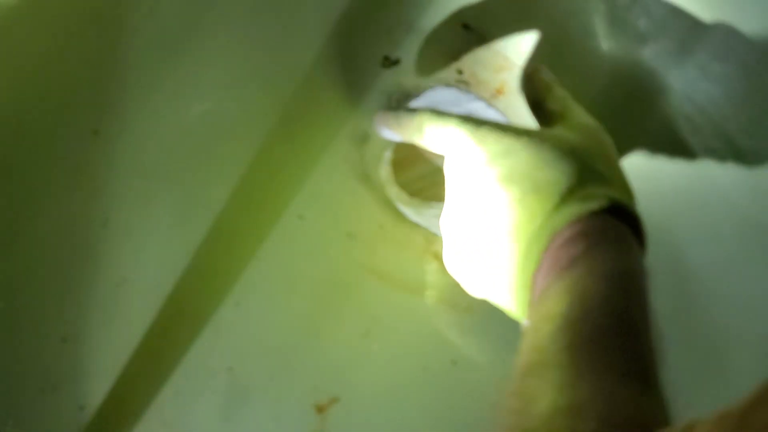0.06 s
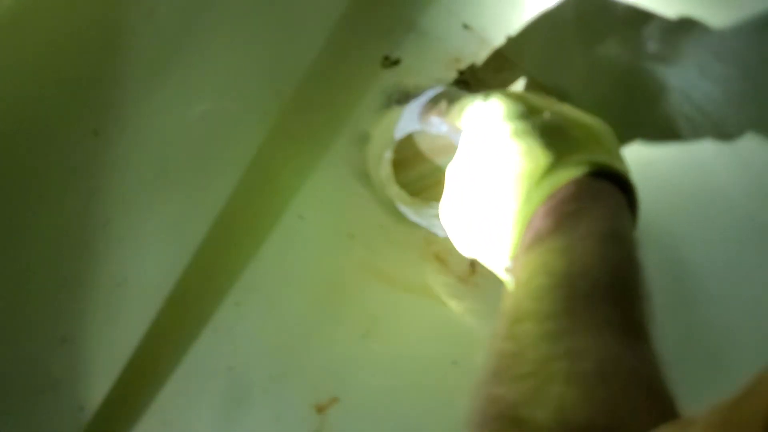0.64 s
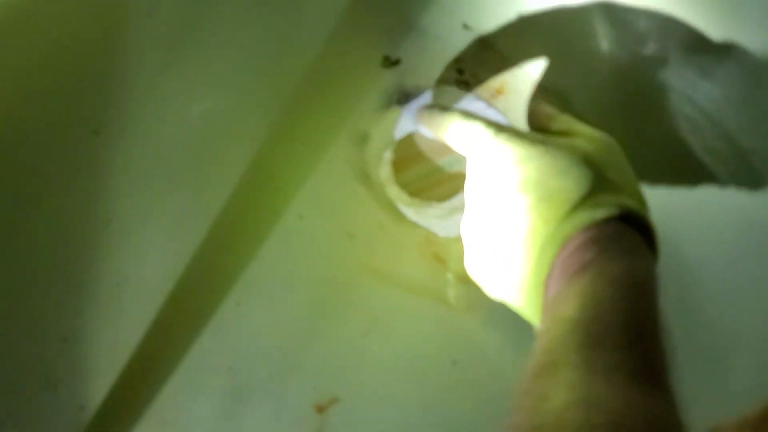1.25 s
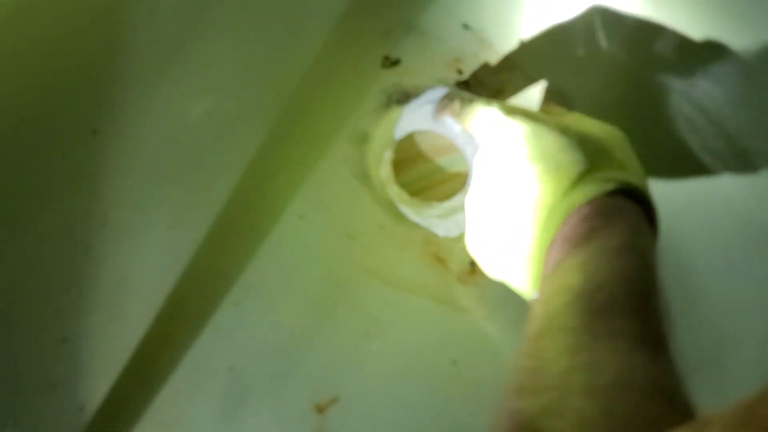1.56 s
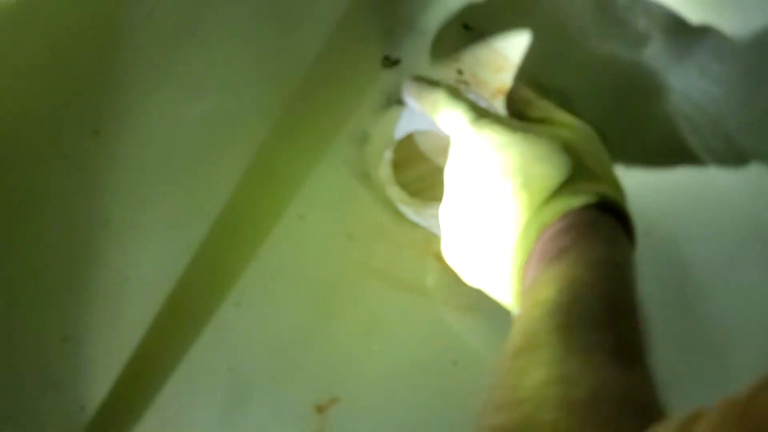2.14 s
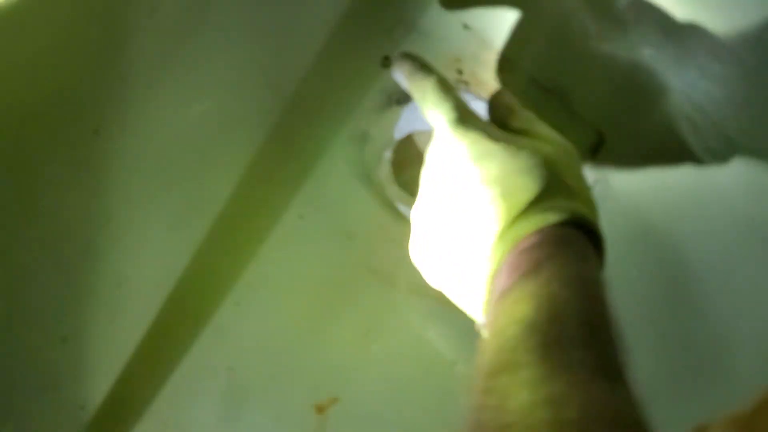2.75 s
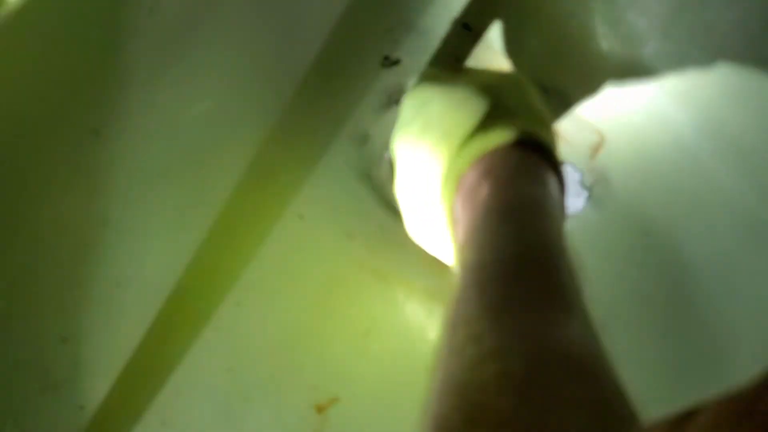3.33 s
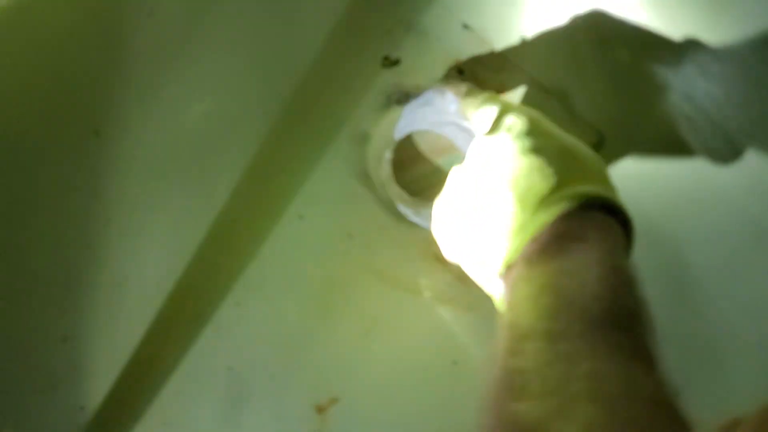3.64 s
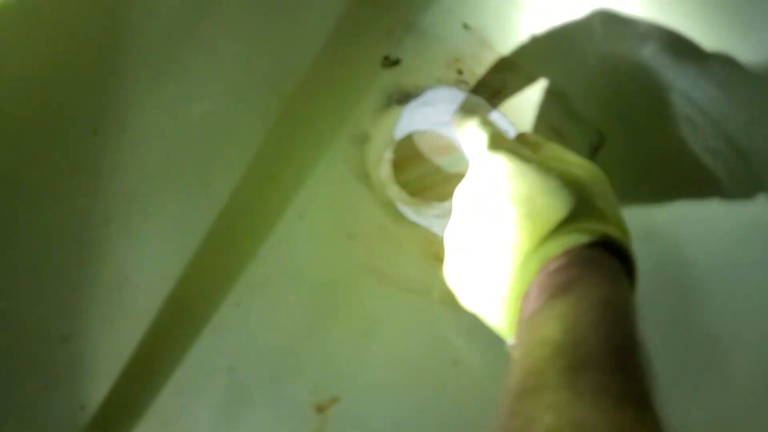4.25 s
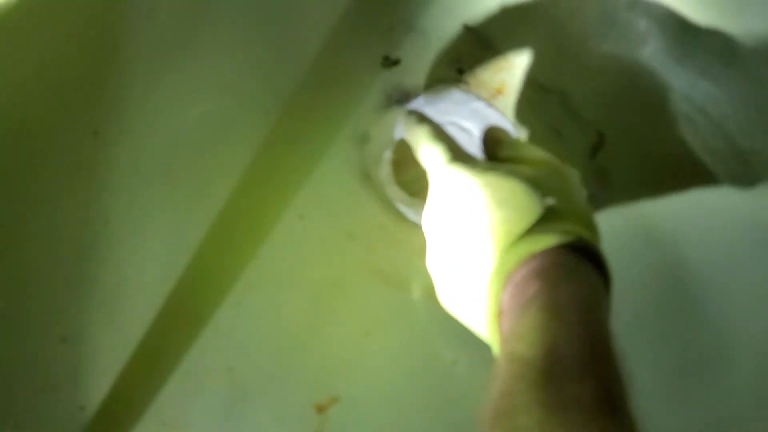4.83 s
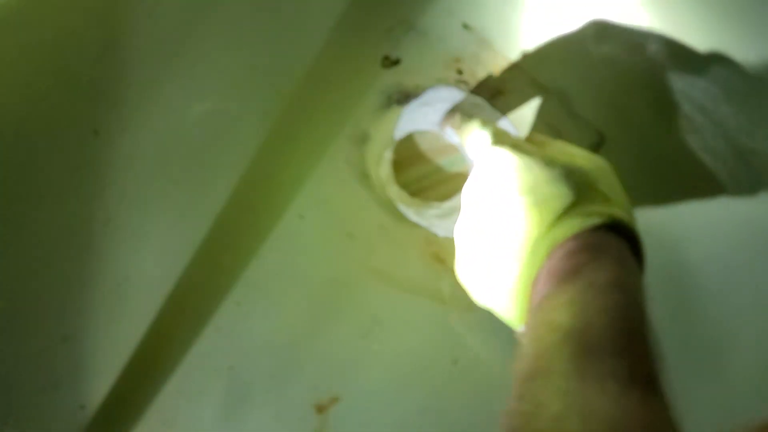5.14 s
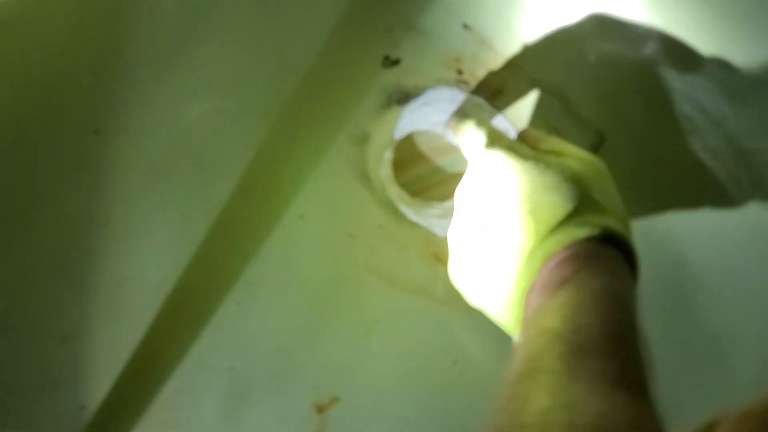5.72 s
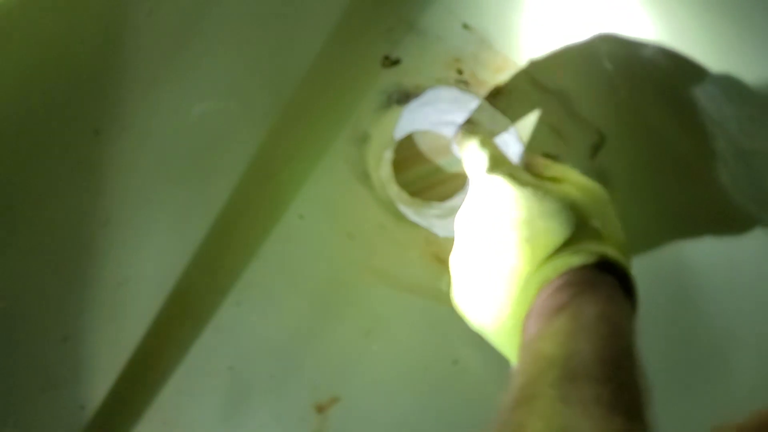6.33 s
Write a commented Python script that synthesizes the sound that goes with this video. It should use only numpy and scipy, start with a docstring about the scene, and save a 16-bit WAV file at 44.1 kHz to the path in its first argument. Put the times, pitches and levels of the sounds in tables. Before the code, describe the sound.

A scraper rasps around a bathtub drain in nine short strokes, ending in hollow knocks, over a quiet bathroom's low hiss.

```python
"""A quiet tiled bathroom, two microphones on the bathtub, the left one a little nearer the drain.
A gloved hand works a small scraper around the drain in nine strokes. Each rasps over the tub floor
in stick-slip grit and ends in a knock: the edge cracks, the floor thumps, the shell rings.
In between, the edge ticks on grit, pushes flex the floor and the glove rubs softly.
Tub and tiled walls throw the sound back; a low rumble and a soft hiss lie underneath."""
import sys
import numpy as np
from scipy import signal
from scipy.fft import rfft, irfft
from scipy.io import wavfile

SR = 44100
rng = np.random.default_rng(int(sys.argv[2]) if len(sys.argv) > 2 else 0)


def waveform_to_disk(signal):
    """Save audio, clipped to [-1, 1], as 16-bit WAV at the path in sys.argv[1]."""
    frames = np.transpose(np.atleast_2d(signal))
    scaled = np.clip(frames, -1, 1) * 32767
    samples = np.round(scaled).astype(np.int16)
    wavfile.write(sys.argv[1], SR, samples)


N = 281358

# room tone, low and high: freq_hz, level_db
RUMBLE_SPECTRUM = [(15, -25), (28, -9), (42, 1.5), (55, 4), (70, 1), (88, 5.5), (100, 5), (120, -11.5),
                   (145, -14), (220, -63.5)]
HISS_SPECTRUM = [(120, 3.5), (180, 2.5), (230, -0.5), (400, 4), (750, 2), (1050, -2), (2900, -3.5),
                 (4200, -9), (7400, -13.5), (8000, -36), (10000, -30), (11200, -22), (16000, -17.5)]
# how alike the two microphones hear diffuse sound: freq_hz, correlation
MIC_LIKENESS = [(60, .97), (190, .97), (350, .92), (640, .5), (1400, .05), (16000, 0)]
# where room tone and tub sit between the microphones: freq_hz, left_minus_right_db
ROOM_TONE_BALANCE = [(60, 1.5), (110, 0.5), (200, -5), (380, -1), (700, -3), (1290, -0.5), (2380, 1.5),
                     (4400, 3.5), (8120, 7.5), (15000, 0.5)]
TUB_BALANCE = [(60, 2), (110, 1.5), (200, 0.5), (380, 1.5), (700, -3), (1290, 0), (2380, 2), (4400, 3.5),
               (8120, 6.5), (15000, 5)]
# echo decay of tub and bathroom: freq_hz, t60_s
ROOM_DECAY = [(200, 0.23), (700, 0.36), (2500, 0.28), (5000, 0.23), (9000, 0.17), (15000, 0.13)]
# modes of the tub shell: pitch_hz, level_db, t60_s
SHELL_MODES = [(186.6, 9, 0.26), (274.3, -15, 0.61), (335, -27, 0.27), (395, -3.5, 0.37), (531, 0, 0.29),
               (763, -5.5, 0.55), (781, -1, 0.23), (859, -6, 0.32), (1027, 3.5, 0.25), (1266, -3, 0.35),
               (1320, 3, 0.1), (1414, -5.5, 0.34), (2051, 3.5, 0.2), (2156, -9, 0.4), (2460, -1.5, 0.33),
               (3260, 3, 0.21)]
# one stroke leads into each knock: touch_s, swell_s, bite_s, bite_db, slide_db, shove_db,
# shell_vs_rasp_db, fizz_vs_rasp_db, edge_pitch_hz, edge_ring_db
STROKES = [(0.052, 0.0068, 0.086, -38, -52.5, -43.5, -5.5, -9, 3200, -8),
           (1.086, 0.0073, 1.132, -41, -59.5, -44, -9, -9.5, 4900, 1),
           (2.026, 0.0064, 2.086, -44, -55.5, -46, -5, -11.5, 3330, -7),
           (2.702, 0.03, 2.749, -54.5, -57.5, -43, -3.5, -10, 2520, 3),
           (3.395, 0.015, 3.447, -53.5, -56, -42, -6, -8, 3340, -16),
           (4.008, .014, 4.025, -59, -54, -46, -6, -6.5, 5130, 6.5),
           (4.805, .04, 4.872, -39, -55, -52, -7, -11, 5000, -6),
           (5.483, 0.013, 5.498, -64, -52.5, -41, -4, -7.5, 3500, 2),
           (6.117, 0.011, 6.181, -60, -59, -53, -2.5, -7, 3530, -18)]
# tone of the edge on the tub floor: freq_hz, gain_db
RASP_COLOUR = [(260, 2.5), (500, -6), (800, -6), (1100, -9), (1700, 7), (2600, 2.5), (3300, 3),
               (4200, -0.5), (5500, -2), (7200, 0.5), (8000, -8), (10500, -13.5), (15500, -5.5)]
# borders of a scrape's shell, rasp and fizz bands: freq_hz
SCRAPE_BORDERS_HZ = [230, 1500, 7600, 17000]
# pushes that flex the tub floor: start_s, pitch_hz, level_db
BUMPS = [(0.056, 83.7, -43), (0.064, 182.6, -45), (0.154, 195, -47), (1.136, 85, -42.5), (1.155, 184, -48),
         (1.212, 176.4, -37.5), (2.072, 239, -52.5), (3.001, 82, -40.5), (3.687, 85.3, -34.5),
         (4.112, 175.4, -52), (5.487, 87.4, -40.5), (5.562, 299, -48), (6.181, 308, -53)]
# the edge catches on grit: start_s, peak_db, treble_db
TICKS = [(0.0733, -27, 12), (1.1115, -31.5, 5), (1.129, -33.5, 0), (2.082, -29.5, 2.5), (2.4088, -53, 1.5),
         (2.58, -52, -6), (2.996, -48.5, 1), (3.053, -45, 4.5), (4.016, -42.5, 3), (4.0229, -42, 5),
         (5.493, -40, 4), (6.1804, -25.5, 10)]
# the scraper hits the drain: start_s, strength_db, bass_db_per_octave, treble_db_per_octave,
# thump_db, spot_pitch_hz, spot_db, spot_t60_s
KNOCKS = [(0.155, -40, 3, 1, -35, 773, -47, 0.51), (1.2139, -40.5, 0.5, -1.35, -31.5, 2570, -43.5, 0.29),
          (2.1296, -41.5, -0.3, 0.5, -31.5, 782, -40, 0.1),
          (2.8263, -34.5, 0.24, -2.5, -27, 2094, -36, 0.13),
          (3.528, -38.5, -1.2, 0, -33, 1027, -45.5, 0.31),
          (4.114, -48.5, -2.5, 2.5, -34, 1130, -45.5, 0.28),
          (4.872, -46, -0.2, 1.8, -37, 3200, -41.5, 0.12), (5.5634, -44, 0, 0, -32, 1315, -30.5, 0.03),
          (6.1879, -71, 6, 6, -32, 3430, -48, 0.094)]
# tone of a knock: freq_hz, gain_db
KNOCK_COLOUR = [(90, -3.5), (140, 5), (200, -7), (270, -12), (400, -9), (560, -8.5), (780, -8), (1050, -10),
                (1350, -5), (1750, -3), (2100, -6), (2800, -6.5), (3700, -9.5), (4800, -17.5),
                (7200, -22.5), (7900, -38.5), (10000, -41), (15500, -36)]
# bands of an average knock: low_hz, high_hz, level_db
KNOCK_BANDS = [(135, 249, -10), (238, 450, -9), (486, 1500, -3), (1535, 3500, -1), (3350, 7740, -4.5),
               (7770, 18500, -9.5)]
# the glove regrips: centre_s, level_db, half_width_s
RUBS = [(2.69, -66, .035), (3.206, -52, 0.008)]

MIC_LAG_SAMPLES = 8  # direct sound reaches the right microphone this much later


def amp(db):
    """Decibels to gain."""
    return 10 ** (np.asarray(db) / 20)


def unit(x):
    """Scales to rms 1."""
    return x / np.sqrt(np.mean(x ** 2) + 1e-24)


def read(points, hz):
    """Reads a table on a log-frequency axis."""
    points_hz, values = np.transpose(points)
    return np.interp(np.log(hz + 1), np.log(points_hz + 1), values)


def add(mix, start_s, sound):
    """Mixes a stereo sound in at start_s."""
    part = mix[:, max(round(start_s * SR), 0):][:, :sound.shape[1]]
    part += sound[:, :part.shape[1]]


def colour(x, points, size=4096):
    """Causal filter with the given spectrum, so that attacks stay sharp."""
    log_gain = np.log(amp(read(points, abs(np.fft.fftfreq(size, 1 / SR)))))
    taps = np.fft.ifft(np.exp(np.conj(signal.hilbert(log_gain)))).real
    return signal.fftconvolve(x, taps[None, :size // 2], axes=1)[:, :x.shape[1]]


def band(x, low_hz, high_hz, order=6):
    """Causal band-pass."""
    return signal.sosfilt(signal.butter(order, [low_hz, high_hz], "band", fs=SR, output="sos"), x)


def pan(x, balance):
    """Tilts a stereo sound towards one microphone, band by band."""
    side_db = read(balance, np.fft.rfftfreq(N, 1 / SR)) / 2
    return irfft(rfft(x) * amp([side_db, -side_db]), N)


def diffuse(count, spectrum=((1, 0), (2, 0))):
    """Noise from all around, white by default: alike at both microphones in the bass only."""
    hz = np.fft.rfftfreq(count, 1 / SR)
    left, unrelated = rfft(rng.standard_normal((2, count)))
    likeness = read(MIC_LIKENESS, hz)
    right = likeness * left + np.sqrt(1 - likeness ** 2) * unrelated
    return unit(irfft(np.array([left, right]) * amp(read(spectrum, hz)), count))


def room_tone():
    """Steady low rumble and soft hiss, all around the microphones."""
    rumble = amp(-52) * diffuse(N, RUMBLE_SPECTRUM)
    hiss = amp(-62) * diffuse(N, HISS_SPECTRUM)
    return pan(rumble + hiss, ROOM_TONE_BALANCE)


def reflections(build_s=0.0006):
    """Dense echoes off the tub and the tiles, each band dying at its own speed."""
    count = SR // 2
    hz, frame_s, spectra = signal.stft(diffuse(count), SR, nperseg=256)
    decay = amp(-60 * frame_s / read(ROOM_DECAY, hz)[:, None])
    tail = signal.istft(spectra * decay, SR, nperseg=256)[1][:, :count]
    t = np.arange(count) / SR
    tail *= 1 - np.exp(-t / build_s)
    return tail / np.linalg.norm(tail[0])


def shell_ring():
    """The tub shell rings in its modes, with new phases at every contact."""
    t = np.arange(SR // 2) / SR
    ring = np.zeros((2, len(t)))
    for hz, db, t60_s in SHELL_MODES:
        mic_phase_gap = np.arccos(read(MIC_LIKENESS, hz)) * rng.choice([-1, 1])
        phase = 2 * np.pi * rng.random() + np.array([[0], [mic_phase_gap]])
        ring += amp(db - 60 * t / t60_s) * np.sin(2 * np.pi * hz * t + phase)
    return ring / np.linalg.norm(ring[0])


def tub_response(walls, direct_db, ring_db):
    """A click on the tub at the microphones: direct sound, echoes and the ringing shell."""
    echoes = np.sqrt(0.25) * walls + np.sqrt(0.75) * reflections()  # most shift with the hand
    response = echoes + amp(ring_db) * shell_ring()
    response[0, 0] += amp(direct_db)
    response[1, MIC_LAG_SAMPLES] += amp(direct_db)
    return response


def grit(count, per_s, spread_db):
    """Tiny slips at random moments, some larger than the rest."""
    sizes = amp(spread_db * np.minimum(rng.exponential(1, count), 2))
    signs = rng.choice([-1, 1], count)
    return sizes * signs * (rng.random(count) < per_s / SR)


def surge(t, rise_s, fall_s):
    """A force that builds up to 1 at t = 0 and lets go."""
    return np.exp(np.minimum(t / rise_s, -t / fall_s))


def edge_ring(slips, hz, width_hz):
    """The scraper's edge resonates along the pitch curve hz."""
    carrier = np.exp(2j * np.pi * np.cumsum(hz) / SR)
    pole = np.exp(-np.pi * width_hz / SR)
    return 2 * (carrier * signal.lfilter([1 - pole], [1, -pole], slips / carrier)).real


def scrapes(walls, flat_edge_hz=2430, stop_s=0.0041):
    """The edge touches, bites, slides and is shoved home; stick-slip rings it and shakes the tub."""
    out = np.zeros((2, N))
    response = colour(tub_response(walls, direct_db=-4.5, ring_db=-14), RASP_COLOUR)
    bands = [band(response, *borders) for borders in zip(SCRAPE_BORDERS_HZ, SCRAPE_BORDERS_HZ[1:])]
    bands = [part / np.linalg.norm(part[0]) for part in bands]
    for stroke, (knock_s, *_) in zip(STROKES, KNOCKS):
        touch_s, swell_s, bite_s, bite_db, slide_db, shove_db = stroke[:6]
        shell_db, fizz_db, edge_hz, edge_db = stroke[6:]
        t = touch_s + np.arange(SR // 4) / SR
        contact = 1 - np.exp(-((t - touch_s) / swell_s) ** 2)
        contact *= np.exp(np.minimum(knock_s - t, 0) / stop_s)  # the drain stops the stroke
        drag = amp(slide_db) + amp(bite_db) * surge(t - bite_s, rise_s=0.0083, fall_s=0.012)
        shove = amp(shove_db) * surge(t - knock_s, rise_s=0.0078, fall_s=stop_s)
        flatness = np.minimum((t - touch_s) / (knock_s - touch_s), 1) ** 4
        pitch_hz = edge_hz + (flat_edge_hz - edge_hz) * flatness  # sinks as the edge flattens
        slips = unit(grit(len(t), per_s=1500, spread_db=4.5))
        slips += amp(edge_db) * edge_ring(slips, pitch_hz, width_hz=250)
        shell = amp(shell_db) * (drag + amp(10.5) * shove)  # the shove shakes the shell harder
        rasp = drag + shove
        fizz = amp(fizz_db) * rasp
        for force, part in zip((shell, rasp, fizz), bands):
            add(out, touch_s, signal.fftconvolve((slips * contact * force)[None], part, axes=1))
    return out


def thump(hz, rise_s, fall_s, sag=0.05):
    """The tub floor flexes in a low mode; the pitch sags as the push lets go."""
    t = np.arange(SR // 2) / SR
    cycles = hz * (t + sag * fall_s * (1 - np.exp(-t / fall_s)))
    swell = (1 - np.exp(-(t / rise_s) ** 2)) * np.exp(-t / fall_s)
    return np.sin(2 * np.pi * cycles) * swell / swell.max() * np.ones((2, 1))


def bumps():
    """Soft pushes, each sounding one low mode of the tub floor."""
    out = np.zeros((2, N))
    for start_s, hz, db in BUMPS:
        add(out, start_s, amp(db) * thump(hz, rise_s=0.0098, fall_s=0.044))
    return out


def ticks(walls):
    """Single sharp slips of the edge and snaps of the glove."""
    out = np.zeros((2, N))
    for start_s, peak_db, treble_db in TICKS:
        tick = colour(tub_response(walls, direct_db=-6.5, ring_db=-23), RASP_COLOUR)
        tick = colour(tick, [(400, -46), (2500, 6.5), (6000, 7.5), (9000, treble_db)])
        add(out, start_s, amp(peak_db) * tick / abs(tick).max())
    return out


def crack(walls, chatter_db=-9, chatter_s=0.0054):
    """The edge cracks against the drain and chatters in rebounds too light to move the bass."""
    t = np.arange(SR // 20) / SR
    rebounds = grit(len(t), per_s=550, spread_db=15) * np.exp(-t / chatter_s)
    chatter = band(rebounds, 2300, 12000, order=1)
    chatter *= amp(chatter_db) / (np.linalg.norm(chatter) + 1e-12)
    blow = tub_response(walls, direct_db=-10, ring_db=-6.5)
    add(blow, 0, np.array([chatter, np.roll(chatter, MIC_LAG_SAMPLES)]))
    return colour(blow, KNOCK_COLOUR)


def spot_ring(hz, t60_s):
    """The struck spot rings in one dying mode, reaching the left microphone first."""
    lag = np.array([[0], [MIC_LAG_SAMPLES / 2]])
    t = np.maximum(np.arange(SR // 2) - lag, 0) / SR
    return np.sin(2 * np.pi * hz * t) * amp(-60 * t / t60_s)


def knocks(walls, pivot_hz=1850, flex_lead_s=0.0048):
    """The scraper hits the drain: the floor gives way, then the edge cracks and the spot rings."""
    out = np.zeros((2, N))
    for start_s, db, bass_slope, treble_slope, thump_db, spot_hz, spot_db, spot_t60_s in KNOCKS:
        blow = crack(walls)
        for low_hz, high_hz, band_db in KNOCK_BANDS:
            # a flat landing lifts the bass, a sharp one the treble
            octaves = np.log2(np.sqrt(low_hz * high_hz) / pivot_hz)
            lift_db = abs(octaves) * (treble_slope if octaves > 0 else bass_slope)
            part = band(blow, low_hz, high_hz)
            attack_rms = part[:, :SR // 25].std()
            add(out, start_s, amp(db + band_db + lift_db) * part / attack_rms)
        add(out, start_s, amp(spot_db) * spot_ring(spot_hz, spot_t60_s))
        add(out, start_s - flex_lead_s, -amp(thump_db) * thump(hz=82.8, rise_s=0.0088, fall_s=0.032))
    return out


def glove_rubs(walls):
    """The glove slides on the scraper: fine bright grit with a soft start."""
    t = np.arange(N) / SR
    pressure = sum(amp(db) * np.exp(-((t - centre_s) / half_s) ** 2) for centre_s, db, half_s in RUBS)
    slips = pressure * unit(grit(N, per_s=9000, spread_db=13))
    response = colour(walls, [(300, -1), (3000, 3.5), (7000, 3), (8200, -2), (15000, -4)])
    return signal.fftconvolve(slips[None], response / np.linalg.norm(response[0]), axes=1)[:, :N]


def scene():
    """All the hand's work in one tub, over the bathroom's room tone."""
    walls = reflections()
    work = scrapes(walls) + bumps() + ticks(walls) + knocks(walls) + glove_rubs(walls)
    return room_tone() + pan(work, TUB_BALANCE)


def record(dry, cutoff_hz=15900):
    """The recorder's band limit."""
    low_pass = signal.firwin(511, cutoff_hz, window=("kaiser", 9), fs=SR)
    return signal.oaconvolve(dry, low_pass[None], "same")


dry = scene()
out = record(dry)
waveform_to_disk(out)
```